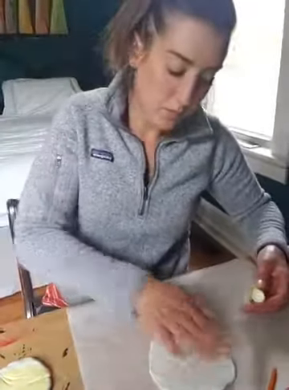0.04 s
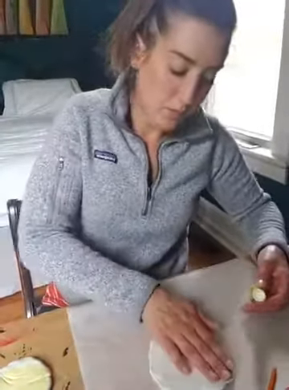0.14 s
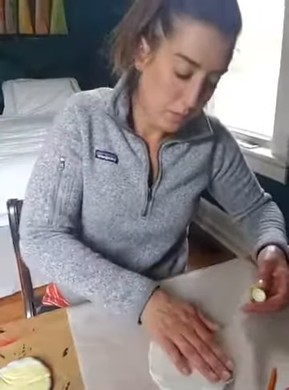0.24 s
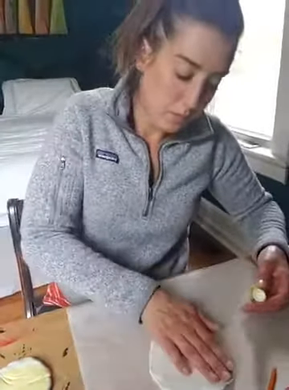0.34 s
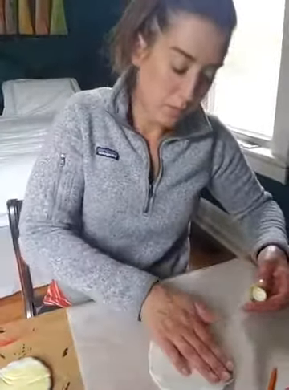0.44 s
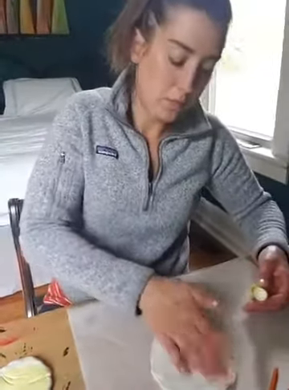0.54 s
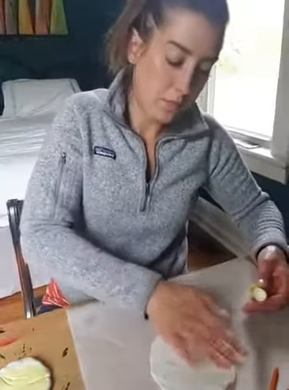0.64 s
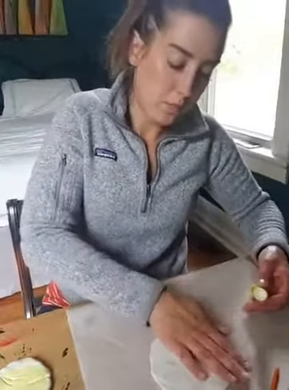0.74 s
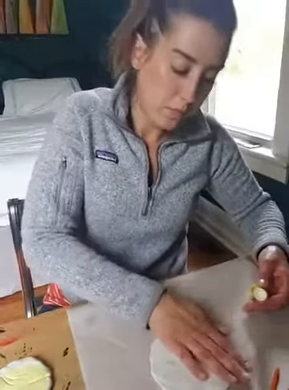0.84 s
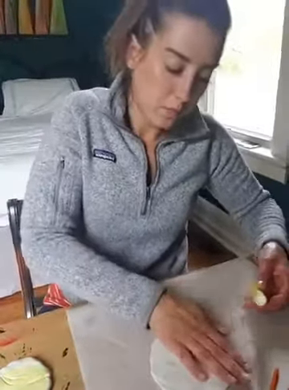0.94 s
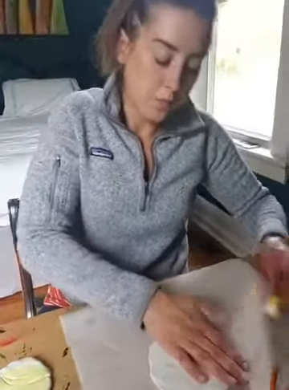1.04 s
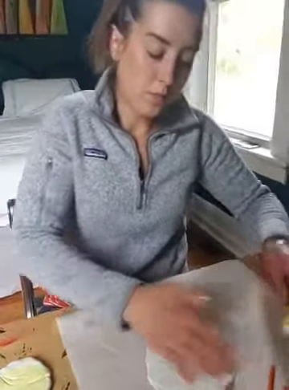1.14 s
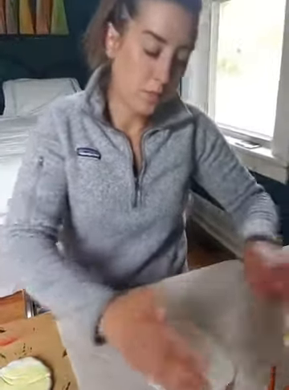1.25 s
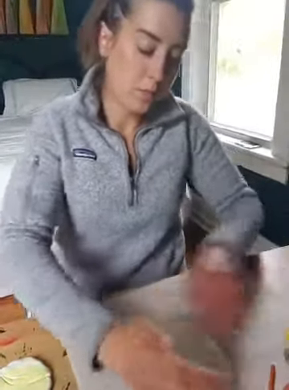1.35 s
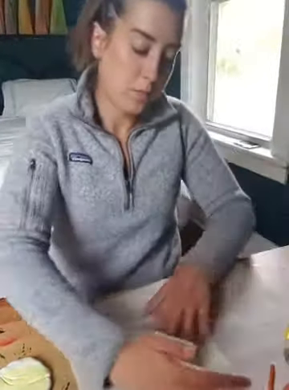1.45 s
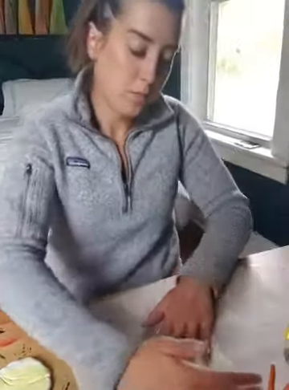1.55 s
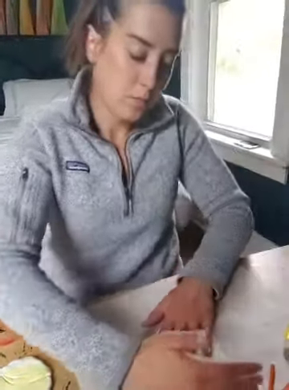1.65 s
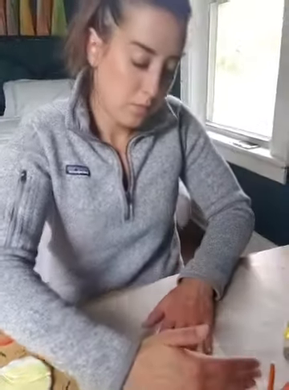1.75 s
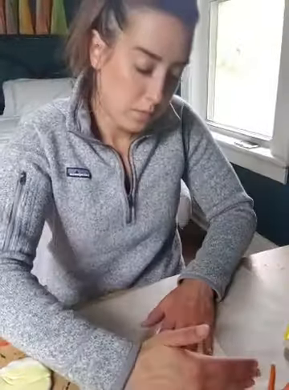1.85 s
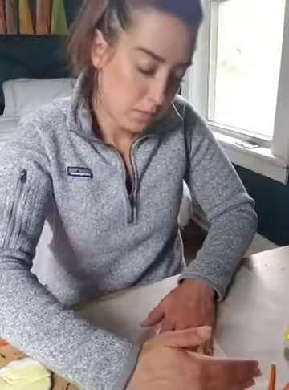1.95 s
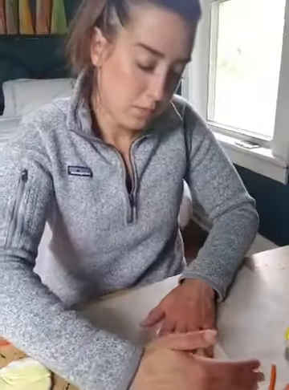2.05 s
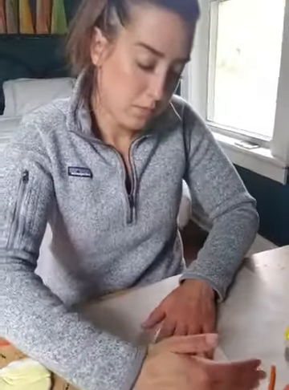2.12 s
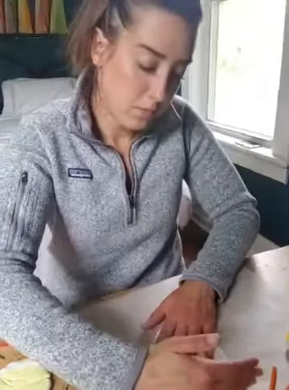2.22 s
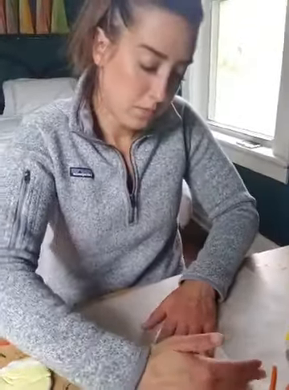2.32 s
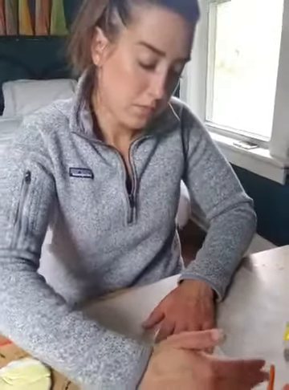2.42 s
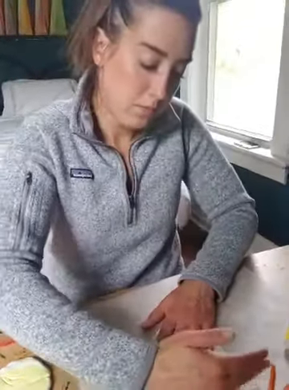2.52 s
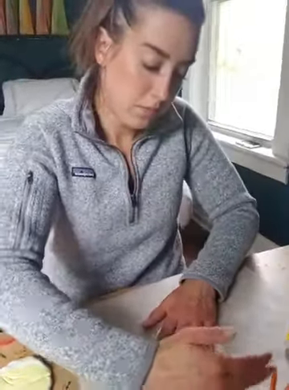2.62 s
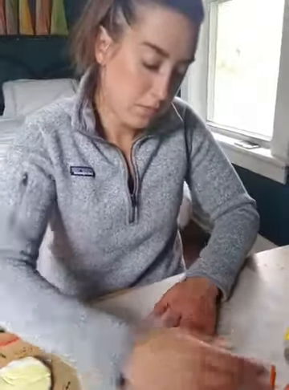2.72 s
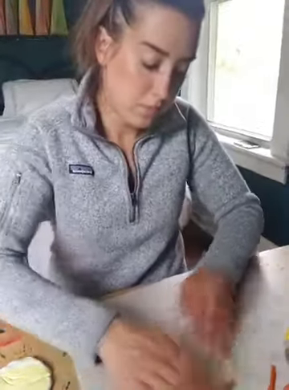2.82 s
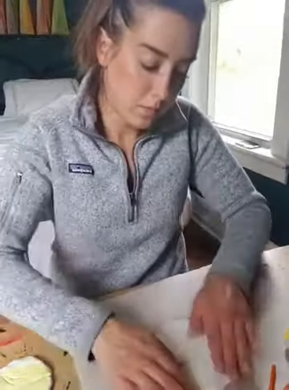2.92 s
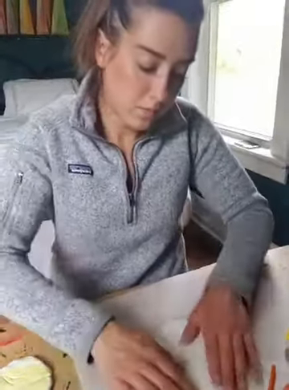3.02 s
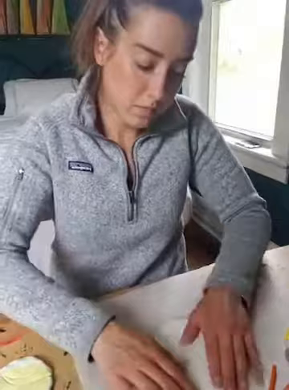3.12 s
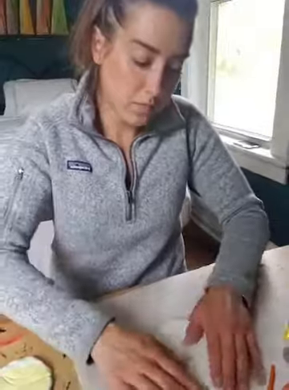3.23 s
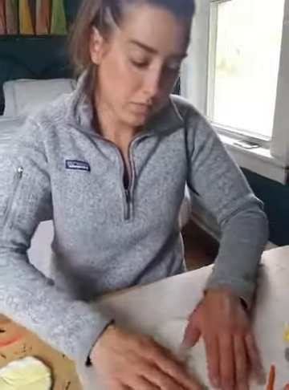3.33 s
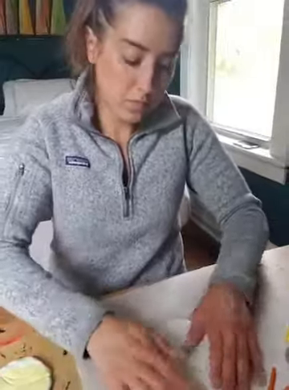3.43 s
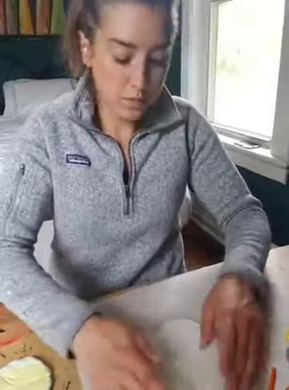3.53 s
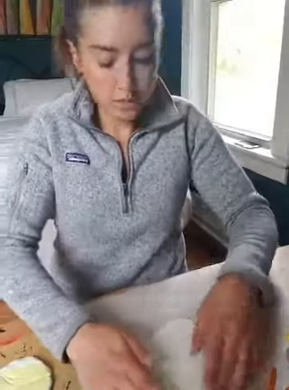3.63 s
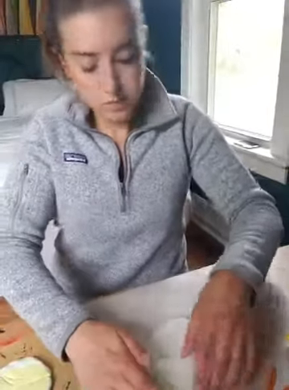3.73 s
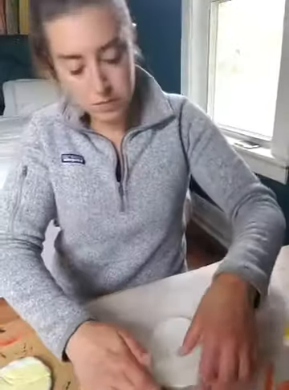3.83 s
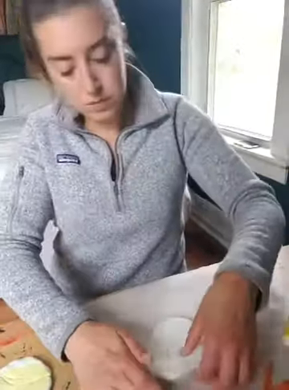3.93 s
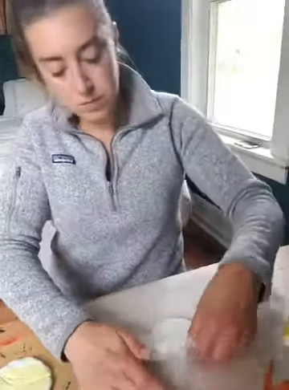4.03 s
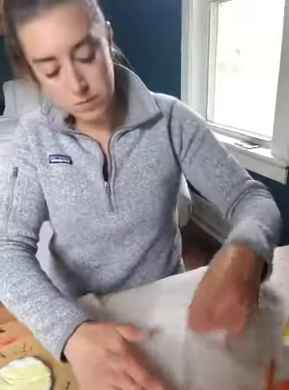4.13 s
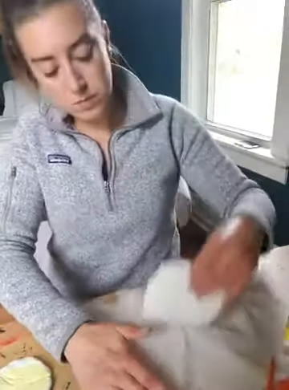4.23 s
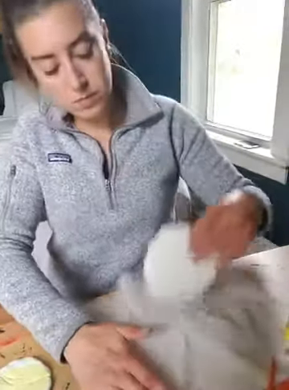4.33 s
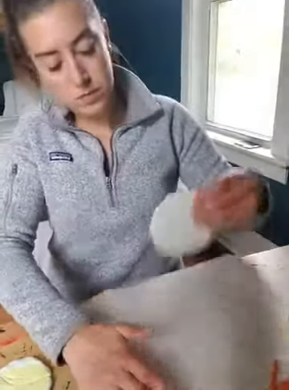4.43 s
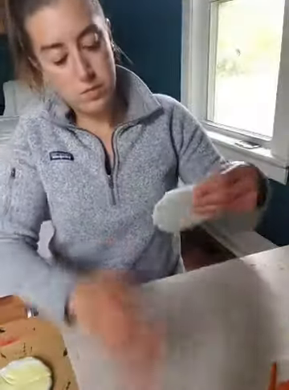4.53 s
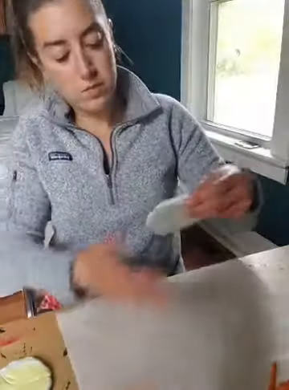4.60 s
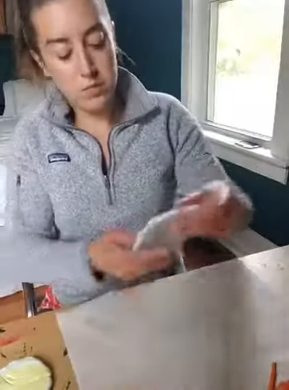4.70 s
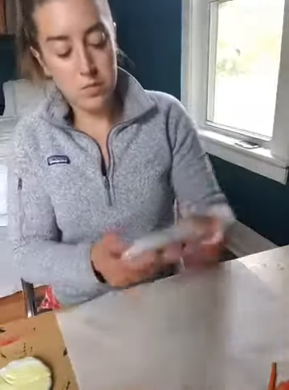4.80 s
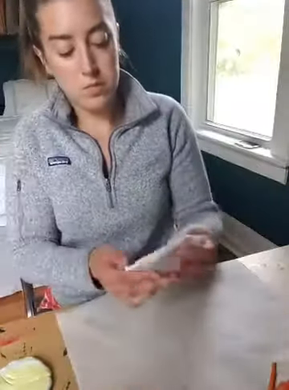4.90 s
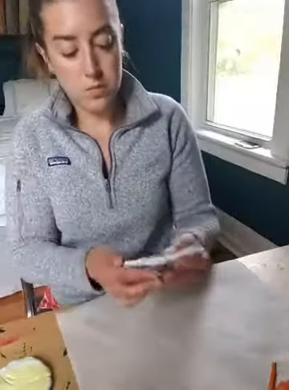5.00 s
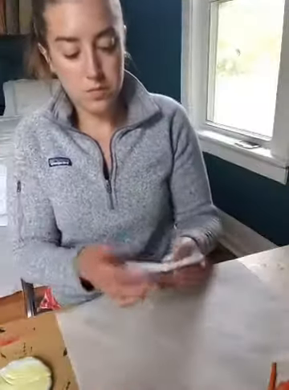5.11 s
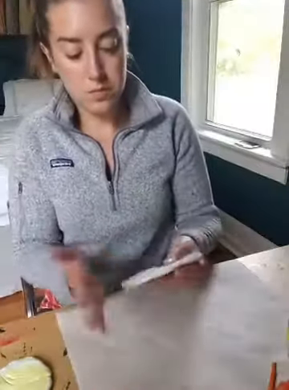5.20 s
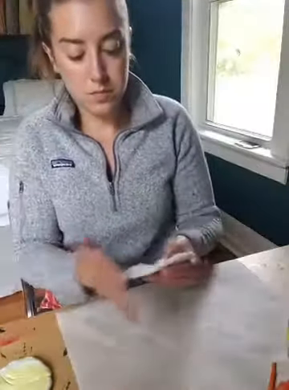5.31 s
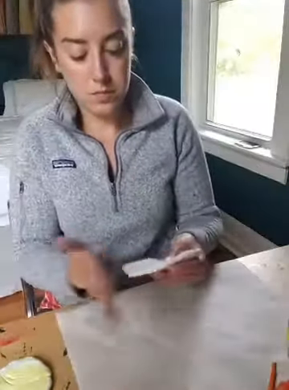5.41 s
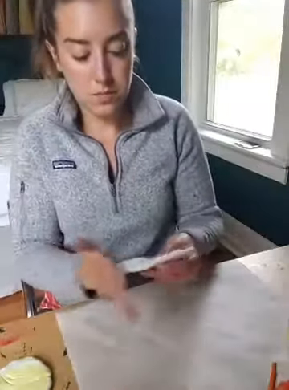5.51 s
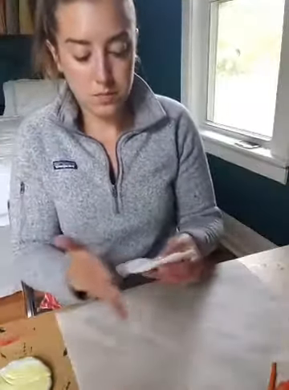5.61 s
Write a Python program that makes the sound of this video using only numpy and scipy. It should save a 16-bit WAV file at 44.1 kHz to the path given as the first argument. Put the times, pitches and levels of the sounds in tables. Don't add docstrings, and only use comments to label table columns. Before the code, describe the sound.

Quiet paper rustles and dull palm thuds, one sharp wooden clatter, then a dense burst of crisp parchment crackling that fades to near silence.

```python
import sys
import numpy as np
from scipy import signal
from scipy.fft import rfft, irfft, next_fast_len
from scipy.io import wavfile

SR = 44100
rng = np.random.default_rng(int(sys.argv[2]) if len(sys.argv) > 2 else 0)


def transcribe(signal):
    frames = np.atleast_2d(signal).T
    limited = np.clip(frames, -1, 1)
    pcm = np.round(limited * 32767).astype(np.int16)
    wavfile.write(sys.argv[1], SR, pcm)


def decibels_to_gain(level_db):
    exponent = np.asarray(level_db, float) / 20
    return 10 ** exponent


N = 249603
TIME_S = np.arange(N) / SR
RANGE_DB = 30


def rms_one(x):
    return x / np.sqrt(np.mean(x ** 2) + 1e-20)


def in_time(rows):
    s, *columns = np.transpose(rows)
    return [np.interp(TIME_S, s, column) for column in columns]


def at_hz(points, hz):
    point_hz, value = np.transpose(points)
    return np.interp(np.log(hz + 1), np.log(point_hz), value)


def colour(x, spectrum):
    gain = decibels_to_gain(at_hz(spectrum, np.fft.rfftfreq(len(x), 1 / SR)))
    return rms_one(irfft(rfft(x) * gain, len(x)))


def band_pass(x, low_hz, high_hz, order=2):
    sos = signal.butter(order, [low_hz, high_hz], "band", fs=SR, output="sos")
    return signal.sosfilt(sos, x)


def drift(hz):
    r = np.exp(-2 * np.pi * hz / SR)
    walk = signal.lfilter([1], [1, -2 * r, r * r], rng.standard_normal(N + SR))
    return rms_one(walk[SR:])


def ring(x, hz, t60_s):
    r = decibels_to_gain(-60 / (t60_s * SR))
    w = 2 * np.pi * hz / SR
    return signal.lfilter([0, np.sin(w)], [1, -2 * r * np.cos(w), r * r], x + 1e-18)


def grains(per_s, spread_db, clump_db, clump_hz):
    sizes = decibels_to_gain(spread_db * np.minimum(rng.exponential(1, N), 5)) * rng.choice([-1, 1], N)
    happens = rng.random(N) < per_s / SR
    return sizes * happens * decibels_to_gain(clump_db * drift(clump_hz))


def peaked(peak_s, rise_s, fall_s, db):
    t = np.arange(0, N + 32, 32) / SR
    power = 0
    for at, rise, fall, top_db in zip(*np.broadcast_arrays(peak_s, rise_s, fall_s, db)):
        away = np.maximum((at - t) / max(rise, 0.003), (t - at) / max(fall, 0.01))
        power = power + decibels_to_gain(top_db - RANGE_DB * away) ** 2
    return np.interp(TIME_S, t, np.sqrt(power))


def resting(before_db, after_db):
    step_s, step_length_s, sink_db = 4.3, 0.2, 2.5
    s = [step_s, step_s + step_length_s, N / SR]
    return decibels_to_gain(np.interp(TIME_S, s, [before_db, after_db, after_db - sink_db]))


# time in seconds, level in dB.
HUM_LEVEL = [(0.0, -46), (0.08, -47.5), (0.44, -55), (0.68, -53), (1.02, -55), (1.15, -49), (1.32, -55.5),
             (1.54, -50.5), (1.66, -55.5), (2.03, -60), (2.11, -55), (3.12, -59), (3.23, -55.5),
             (3.42, -54), (3.85, -59.5), (4.0, -53.5), (4.46, -68.5), (4.75, -66)]
# frequency in Hz, level in dB per Hz.
HISS_SPECTRUM = [(20, -15), (45, 6), (75, 8), (100, -4), (150, 3.5), (280, -5), (400, -16), (1000, -21),
                 (1600, -29), (6000, -28), (7400, -18.5), (8100, -19.5), (8400, -51), (11200, -34.5),
                 (12400, -27), (16000, -28.5)]


def background():
    hum_hz, wobble_rad = 120, 0.29
    hum_db, = in_time(HUM_LEVEL)
    phase = 2 * np.pi * hum_hz * TIME_S + wobble_rad * drift(11.0)
    hum = np.sqrt(2) * np.sin(phase) * decibels_to_gain(hum_db - 1.0 + 1.6 * drift(2.9))
    hiss = colour(rng.standard_normal(N), HISS_SPECTRUM)
    hiss_level = decibels_to_gain(7 + 1.0 * drift(2.0)) * resting(-70.5, -74.5)
    return hum + hiss_level * hiss


# time in seconds, peak in dB, upper modes in
# dB, sway in dB, creaking of the top in dB.
TABLE_THUMPS = [(0.042, -40, -14, -37, -61.5), (0.391, -42.5, -15, -67.5, -44), (0.674, -29.5, -10, -37.5, -62),
                (0.867, -45.5, -13.5, -56.5, -50), (0.96, -42, -5, -49.5, -39), (1.133, -35, 3, -42, -23),
                (1.183, -37, -23, -56, -27), (1.226, -50.5, 11.5, -70, -38), (1.289, -48.5, 3, -49, -59),
                (1.49, -35, -17.5, -42.5, -59.5), (2.026, -49, -3, -50, -69), (2.458, -45.5, -4.5, -64, -58.5),
                (2.547, -49, -11, -71.5, -59), (2.639, -51.5, -2.5, -44.5, -43.5), (2.69, -30, -15, -41.5, -44),
                (2.73, -42, -32, -50, -65), (2.926, -38, -9.5, -46.5, -60), (3.165, -41, -6.5, -54.5, -62),
                (3.221, -29, -15, -45.5, -72), (3.256, -46, -26, -51, -69), (3.402, -44, -25, -68, -55.5),
                (3.548, -41, -13, -56, -63), (3.697, -49, 5.5, -62.5, -47.5)]
# frequency in Hz, level in dB per Hz.
SWAY_SPECTRUM = [(13, -49.5), (22, -14), (43, 1), (81, -11.5), (110, 1), (140, -15), (240, -120)]
# frequency in Hz, level in dB per Hz.
CREAK_SPECTRUM = [(110, -34), (160, -2.5), (192, 1.5), (225, -9), (258, 1), (280, 1.5), (305, -2.5),
                  (350, -3), (450, -14), (650, -38)]


def table():
    rise_s, sway_fall_db_per_s, creak_fall_db_per_s = 0.01, 131, 218.5
    s, _, _, sway_db, creak_db = np.transpose(TABLE_THUMPS)
    pull_db, slack_db = peel()
    shake = decibels_to_gain(pull_db + slack_db)
    sway = peaked(s + rise_s, rise_s, RANGE_DB / sway_fall_db_per_s, sway_db)
    sway = sway + decibels_to_gain(-15) * shake + resting(-62.5, -68.5) * decibels_to_gain(3.0 * drift(2.5))
    creak = peaked(s + rise_s, rise_s, RANGE_DB / creak_fall_db_per_s, creak_db)
    creak = creak + decibels_to_gain(-5) * shake + resting(-71.5, -92) * decibels_to_gain(2.7 * drift(4.0))
    swaying = decibels_to_gain(-3.0) * sway * colour(rng.standard_normal(N), SWAY_SPECTRUM)
    creaking = decibels_to_gain(-4.5) * creak * colour(rng.standard_normal(N), CREAK_SPECTRUM)
    return swaying + creaking


# frequency in Hz, level in dB, t60 in seconds.
TABLE_MODES = [(54.7, -9.5, 0.58), (89, 0, 0.097), (132.7, -8.5, 0.32), (200.7, -4.5, 0.25),
               (245, 0.5, 0.05), (310, -2.5, 0.089), (427.8, -6.5, 0.0766)]


def thumps():
    contact_hz, luck_db = 290, 3.3
    contact = np.hanning(int(SR / contact_hz))
    contact = contact / contact.sum()
    upper = np.array(TABLE_MODES)[:, 0] > 150
    push = np.zeros((len(TABLE_MODES), N))
    luck = rng.normal(0, luck_db, (len(TABLE_THUMPS), len(TABLE_MODES)))
    for (s, peak_db, upper_db, _, _), own_db in zip(TABLE_THUMPS, luck):
        at = round(s * SR)
        strength = decibels_to_gain(peak_db - 2.5 + own_db + upper * (upper_db + 7.0))
        push[:, at:at + len(contact)] += np.outer(strength, contact)
    return sum(decibels_to_gain(db) * ring(p, hz, t60_s) for p, (hz, db, t60_s) in zip(push, TABLE_MODES))


# time in seconds, peak in dB, contact cut-off in Hz.
TOOL_HITS = [
    (1.1330, -9.5, 9150),
    (1.142, -31, 7030),
    (1.166, -17.5, 1780),
    (1.1829, -14, 690),
    (1.2275, -24, 900),
    (1.2890, -34.5, 2520),
    (2.0310, -46, 1814),
]
# frequency in Hz, level in dB, t60 in seconds.
TOOL_MODES = [(377, -3, 0.012), (537.6, -1.5, 0.015), (767, 4, 0.011), (960, 0.5, 0.014), (1270, 4, 0.012),
              (1586, 2.5, 0.0036), (2060, -1, 0.013), (2600, -1.5, .004), (3500, -0.5, 0.0021),
              (5480, -2, 0.0013)]


def tool(scuff_s, crack_db):
    t = np.arange(SR // 10) / SR
    out = np.zeros(N)
    for (s, peak_db, cut_hz), noise in zip(TOOL_HITS, rng.standard_normal((len(TOOL_HITS), len(t)))):
        contact = noise * np.exp(-t / scuff_s)
        contact = contact / np.sqrt(np.sum(contact ** 2))
        hit = decibels_to_gain(crack_db) * contact
        for k, (hz, db, t60_s) in enumerate(TOOL_MODES):
            hit = hit + (-1) ** k * decibels_to_gain(db) * ring(contact, hz, t60_s)
        at = round(s * SR)
        out[at:at + len(t)] += decibels_to_gain(peak_db - 2.5) * band_pass(hit, 250, cut_hz, order=1)
    return out


# time in seconds, peak in dB, centre in Hz,
# fade in seconds.
FINGER_BRUSHES = [(2.264, -71, 1389, 0.057), (5.0980, -72, 5010, 0.035), (.06, -68, 4550, 0.031),
                  (.945, -56, 5460, 0.026), (1.0, -54.5, 2940, .02), (1.024, -50.5, 2900, 0.018),
                  (2.664, -41, 2880, 0.017), (2.866, -59, 2700, 0.011), (3.182, -51, 4530, 0.033),
                  (3.378, -47, 2980, 0.037), (3.58, -51, 2320, .006), (3.684, -51, 2870, 0.0067),
                  (3.76, -46, 2100, 0.033), (3.87, -48, 1850, .08), (3.92, -31.5, 1990, 0.0072),
                  (3.937, -37.5, 1840, 0.012), (3.99, -51, 1080, 0.019), (4.108, -26.5, 1760, 0.013),
                  (4.107, -28, 2803, 0.0058), (4.205, -32, 3800, 0.011), (.972, -51, 2580, .04),
                  (.955, -55, 3930, 0.045), (2.034, -64, 1310, 0.025)]


def brushes():
    size, rise_s = 8000, 0.0083
    t = np.arange(size) / SR
    out = np.zeros(N + size)
    for s, peak_db, hz, fade_s in FINGER_BRUSHES:
        puff = rms_one(band_pass(rng.standard_normal(size), hz * 0.89, hz * 1.25))
        at = round(s * SR)
        out[at:at + size] += decibels_to_gain(peak_db) * puff * np.exp(-t / fade_s) * np.minimum(t / rise_s, 1)
    return out[:N]


# time in seconds, pull in dB, slack of the sheet in dB.
LIFTING = [
    (3.53, -87, -16.5),
    (3.555, -52.5, -20),
    (3.66, -58, -7.5),
    (3.717, -48.5, -9),
    (3.841, -50, -4),
    (3.909, -43.5, -15),
    (4.02, -42, -2.5),
    (4.07, -40, -4),
]
# time in seconds, pull in dB, slack of the sheet in dB.
PEELING = [
    (4.11, -28.5, -6.5),
    (4.15, -37, 2),
    (4.195, -29.5, -3.5),
    (4.26, -30, -1.5),
    (4.3, -35, -8.5),
    (4.35, -44.5, -1.5),
    (4.434, -58.5, -2),
    (4.6, -81, -8),
    (4.7, -105, -6),
]


def peel():
    return in_time(LIFTING + PEELING)


# peak in seconds, rise in seconds, fall in seconds, level in dB,
# weight in dB.
HAND_STROKES = [(0.06, 0.3, 0.16, -75.5, 7.5), (.40, 0.023, 0.23, -76.5, 19), (0.432, 0.049, 0.14, -60, 0),
                (0.681, 0.012, 0.38, -87, 18), (.84, .035, .4, -66, -16), (0.949, 0.019, 0.2, -45.5, -45),
                (0.998, 0.084, .16, -47, -2.5), (1.47, .14, 0.16, -57, -2.5),
                (1.56, 0.43, 0.15, -53, -14.5), (2.002, 0.13, 0.22, -61.5, -3),
                (2.033, 0.016, 0.11, -63.5, 11), (2.259, 0.047, 0.3, -64, -14.5),
                (2.651, 0.031, 0.034, -32, -12), (2.69, 0.077, 0.13, -50, 6),
                (2.865, 0.074, 0.065, -61.5, -15), (2.95, 0.11, 0.088, -59, -7.5),
                (3.11, 0.26, .2, -65.5, -22.5), (3.201, 0.096, .17, -51, -11.5),
                (3.383, 0.097, 0.22, -46, -15.5), (4.87, 0.44, 0.39, -83, -5),
                (5.109, .03, .2, -78.5, -4.5), (5.265, .03, .25, -83.5, -8)]
# frequency in Hz, level in dB per Hz.
CRINKLE_SPECTRUM = [(2500, -21.5), (4000, 5), (5000, 4.5), (8000, 6), (11000, 1.5), (16000, 8)]
# frequency in Hz, level in dB per Hz.
CRACKLE_SPECTRUM = [(900, -26.5), (1500, -5), (2000, -1.5), (2400, -6.5), (2900, 2.5), (4000, -12),
                    (6000, -33.5)]
# frequency in Hz, level in dB per Hz.
FLAP_SPECTRUM = [(200, -25), (380, -12.5), (630, -6.5), (1000, -4), (1400, -10), (2300, -26.5)]


def sheet():
    s, rise_s, fall_s, db, weight_db = np.transpose(HAND_STROKES)
    pull_db, slack_db = peel()
    pull = decibels_to_gain(pull_db) * (np.arange(N) > LIFTING[0][0] * SR)
    rest = resting(-89, -94.5)
    fine = peaked(s, rise_s, fall_s, db) + pull + rest
    coarse = peaked(s, rise_s, fall_s, db - 6 + 0.3 * weight_db) + rest
    coarse = coarse + pull * decibels_to_gain(-3 + 0.2 * slack_db)
    loose = peaked(s, rise_s, fall_s, db + weight_db) + pull * decibels_to_gain(slack_db) + rest
    clumps = decibels_to_gain(1.2 * drift(55))
    crinkle = colour(grains(per_s=18000, spread_db=-4.0, clump_db=2.0, clump_hz=90), CRINKLE_SPECTRUM)
    crackle = colour(grains(per_s=8800, spread_db=4.0, clump_db=1.5, clump_hz=59.4), CRACKLE_SPECTRUM)
    flap = colour(grains(per_s=4000, spread_db=0.5, clump_db=-2.0, clump_hz=40.6), FLAP_SPECTRUM)
    return clumps * (decibels_to_gain(2.0) * fine * crinkle + decibels_to_gain(-2.5) * coarse * crackle + decibels_to_gain(-2.0) * loose * flap)


# time in seconds, peak in dB, centre in Hz, air in dB.
PRESSED_CREASES = [(0.0687, -59, 4750, -16), (0.091, -61, 4537, -25), (.3950, -61, 3030, 2),
                   (0.8728, -56, 4500, -4), (0.9502, -43, 3920, -17.5), (0.9794, -38, 2990, -34),
                   (1.0014, -29, 3370, -21.5), (1.026, -37, 2780, -14), (1.441, -53, 2190, -2),
                   (1.462, -37.5, 2200, -9), (1.5504, -45.5, 4930, -11), (2.2539, -41.5, 4990, -21.5),
                   (2.2643, -52, 5000, -17.5), (2.4663, -52, 3680, -16), (2.6379, -31.5, 4610, -9.5),
                   (2.6449, -24.5, 4800, -36), (2.6704, -24.5, 2840, -23), (2.8704, -46, 2760, -13.5),
                   (2.9427, -45, 4580, -4.5), (3.1809, -35, 4230, -19), (3.3333, -54, 3810, -1),
                   (3.3503, -40, 4310, -20), (3.3753, -27, 2760, -20)]
# time in seconds, peak in dB, centre in Hz, air in dB.
PEELED_CREASES = [(3.5493, -32.5, 3100, -4), (3.5808, -42, 2920, 2.5), (3.6645, -27.5, 3544, -13),
                  (3.6870, -30, 2900, -2.5), (3.6990, -16, 3500, -2), (3.7504, -26, 4960, -17),
                  (3.7668, -23.5, 3880, -5.5), (3.8197, -22.5, 2987, -11.5), (3.8680, -15.5, 3763, -6.5),
                  (3.8774, -25.5, 4467, -18.5), (3.923, -28.5, 2613, -14), (3.9389, -25, 2914, -11),
                  (3.9794, -27.5, 4504, -13), (3.9928, -26, 2940, -3.5), (4.0317, -18, 4850, -18),
                  (4.0444, -24, 2685, -16), (4.0719, -20, 4970, -14.5), (4.0981, -19, 4386, -6),
                  (4.1106, -11.5, 3125, -17), (4.1654, -19, 5000, -19), (4.1864, -18.5, 4720, -5.5),
                  (4.1972, -13.5, 4700, 2), (4.2074, -14, 3620, -14.5), (4.2284, -14.5, 3628, -6),
                  (4.2393, -12, 3796, -21), (4.2484, -11, 4380, -4), (4.2722, -10, 4716, -10),
                  (4.2824, -14.5, 4724, -13.5), (4.2934, -17.5, 4630, -16.5)]


def snaps():
    size, rise_s, fade_s = 4000, 0.00045, 0.0023
    fade_doubles_db = 18
    t = np.arange(size) / SR
    out = np.zeros(N + size)
    for s, peak_db, hz, air_db in PRESSED_CREASES + PEELED_CREASES:
        own_fade_s = fade_s * 2 ** (-air_db / fade_doubles_db)
        burst = rng.standard_normal(size) * np.exp(-t / own_fade_s) * np.minimum(t / rise_s, 1)
        body = (500, 1900, -19.0)
        tint = (hz * 0.57, hz * 2.2, -4.5)
        air = (5500, 16000, air_db + 5.0)
        at = round(s * SR)
        for low_hz, high_hz, db in (body, tint, air):
            part = band_pass(burst, low_hz, high_hz)
            out[at:at + size] += decibels_to_gain(peak_db + db) * part / abs(part).max()
    return out[:N]


# frequency in Hz, t60 in seconds.
ROOM_DECAY = [(100, 0.097), (260, 0.52), (700, 0.31), (1800, 0.38), (5000, 0.37), (13000, 0.088)]


def room(x):
    gap_s, build_s = 0.0024, 0.0071
    t = np.arange(SR) / SR
    edges_hz = 60 * 2 ** (np.arange(25) / 3)
    tail = np.zeros(SR)
    for low_hz, high_hz in zip(edges_hz, edges_hz[1:]):
        t60_s = at_hz(ROOM_DECAY, np.sqrt(low_hz * high_hz))
        tail += band_pass(rng.standard_normal(SR), low_hz, high_hz) * decibels_to_gain(-60 * t / t60_s)
    tail = tail * np.clip((t - gap_s) / build_s, 0, 1)
    return signal.fftconvolve(x, tail / np.sqrt(np.sum(tail ** 2)))[:N]


def scene():
    paper, creases, table_thumps = sheet(), snaps(), thumps()
    drop = tool(scuff_s=0.0089, crack_db=8.5)
    averaged_drop = tool(scuff_s=1 / SR, crack_db=-1.5)
    wet = room(decibels_to_gain(-16.0) * paper + decibels_to_gain(-7.5) * creases + decibels_to_gain(-6) * table_thumps + decibels_to_gain(-6.0) * averaged_drop)
    return (background() + table() + table_thumps + drop + brushes() + paper + creases + wet)[None]


# frequency in Hz, gain in dB.
MIC_RESPONSE = [(20, -24), (42, -3.5), (7600, 0.5), (8600, -3), (11000, 0.5), (12400, 2.5), (14250, 0.5),
                (14500, -41), (15600, -50), (22050, -68)]


def microphone(x):
    size = next_fast_len(N + 8192)
    log_gain = np.log(decibels_to_gain(at_hz(MIC_RESPONSE, np.fft.rfftfreq(size, 1 / SR))))
    cepstrum = irfft(log_gain, size)
    cepstrum[1:size // 2] *= 2
    cepstrum[size // 2 + 1:] = 0
    return irfft(rfft(x, size) * np.exp(rfft(cepstrum)), size)[:, :N]


def band_limit(x):
    return signal.sosfilt(signal.butter(12, 15110, fs=SR, output="sos"), x)


def record(dry):
    noise = band_pass(rng.standard_normal(N), 13000, 15700, order=4)
    return band_limit(microphone(dry) + decibels_to_gain(-99.5) * noise)


dry = scene()
out = record(dry)
transcribe(out)
```